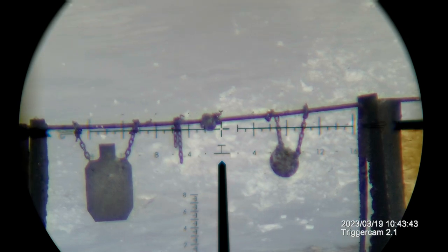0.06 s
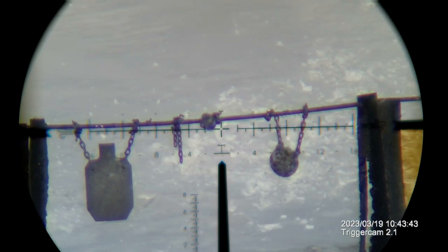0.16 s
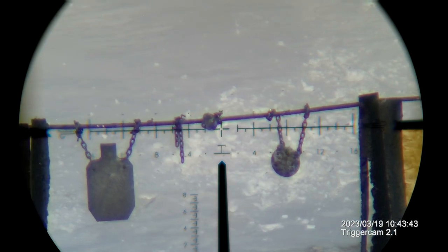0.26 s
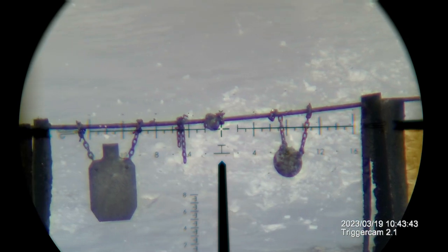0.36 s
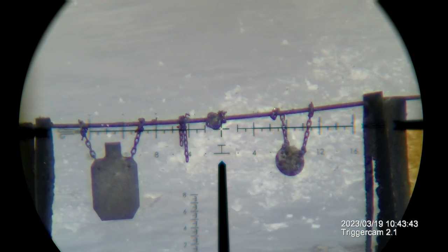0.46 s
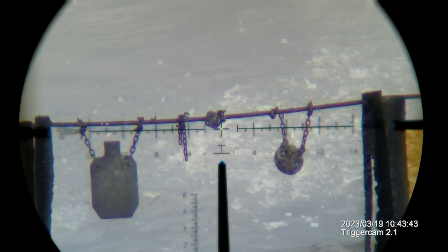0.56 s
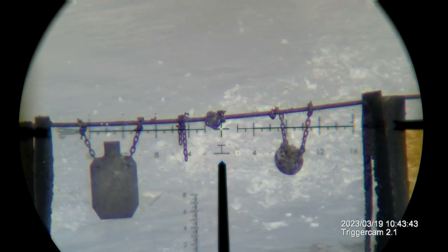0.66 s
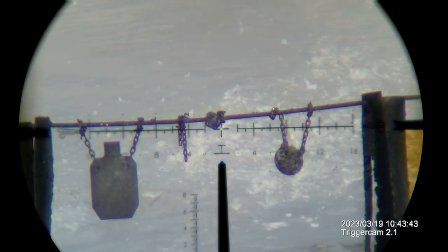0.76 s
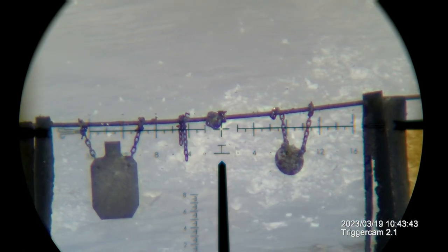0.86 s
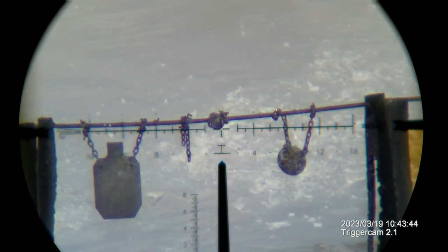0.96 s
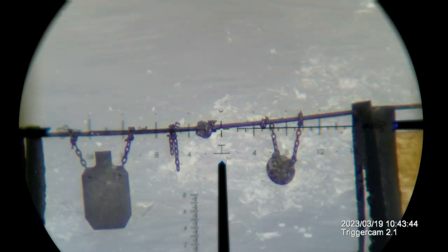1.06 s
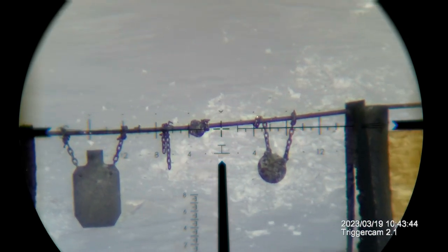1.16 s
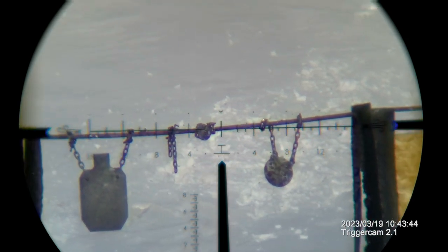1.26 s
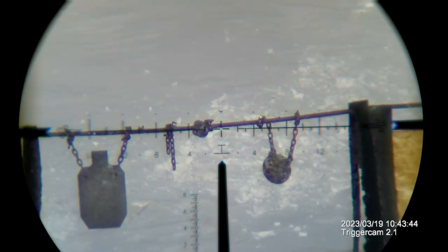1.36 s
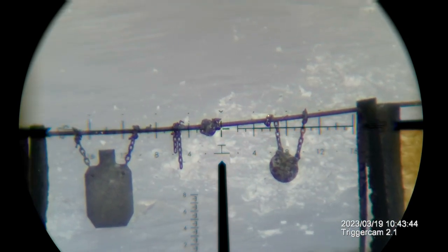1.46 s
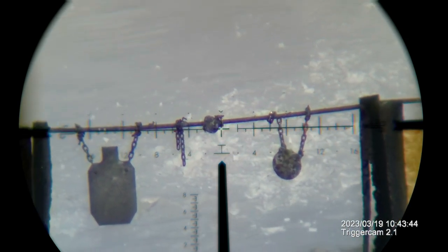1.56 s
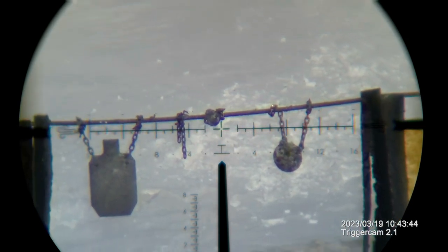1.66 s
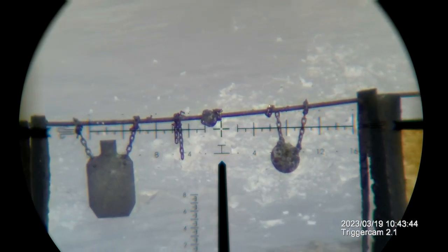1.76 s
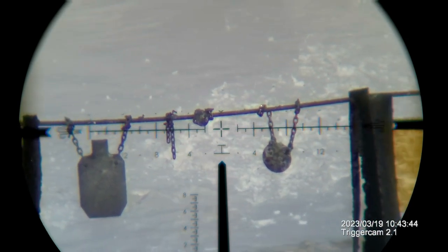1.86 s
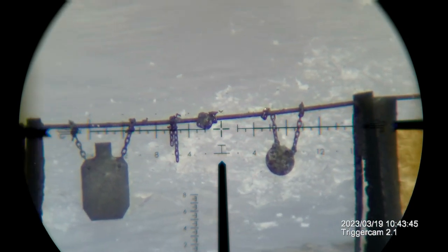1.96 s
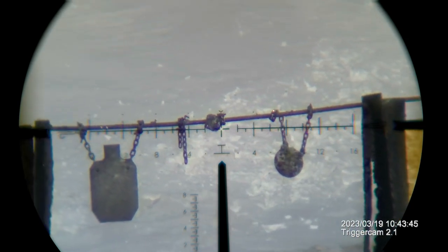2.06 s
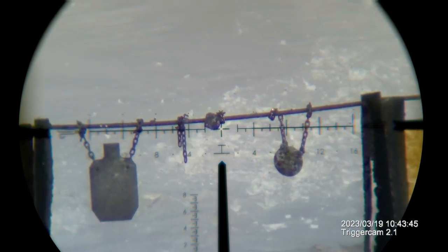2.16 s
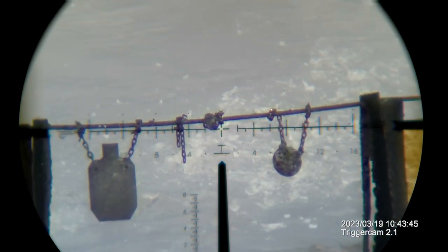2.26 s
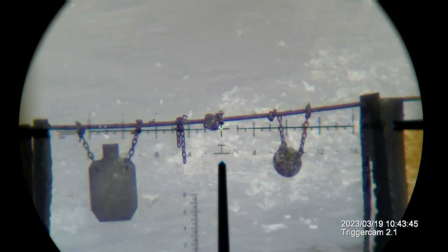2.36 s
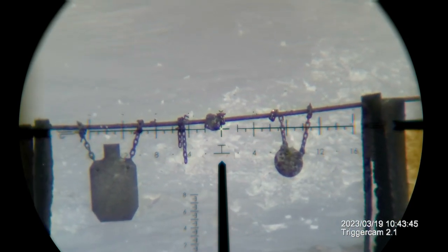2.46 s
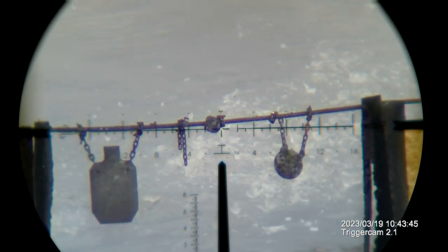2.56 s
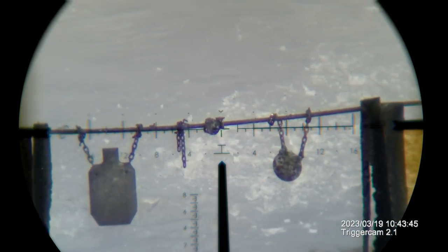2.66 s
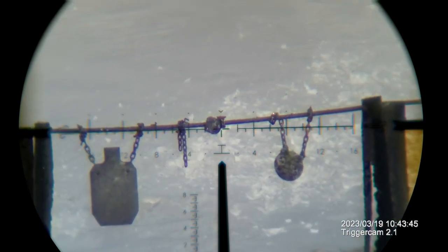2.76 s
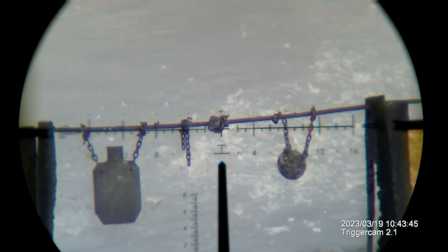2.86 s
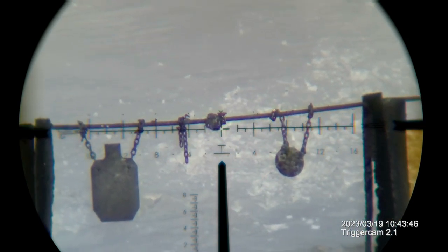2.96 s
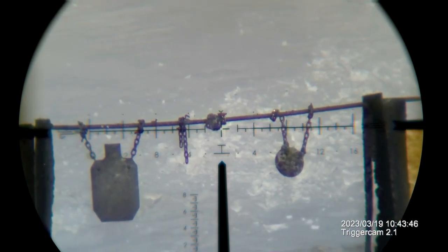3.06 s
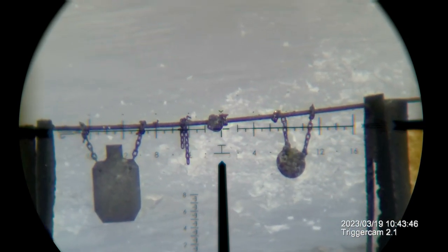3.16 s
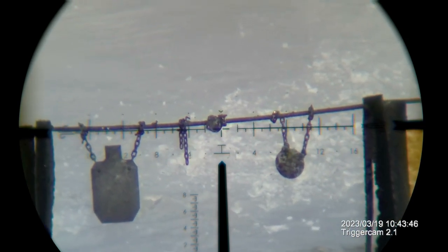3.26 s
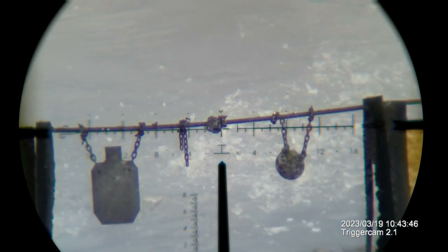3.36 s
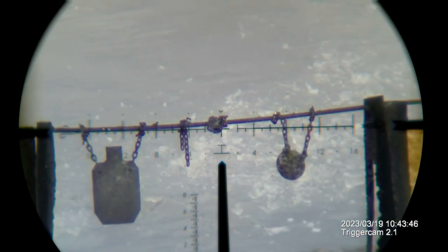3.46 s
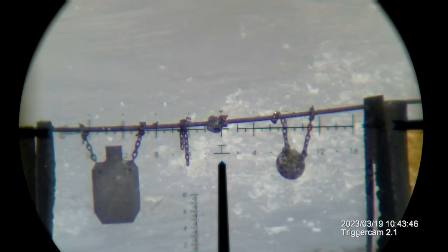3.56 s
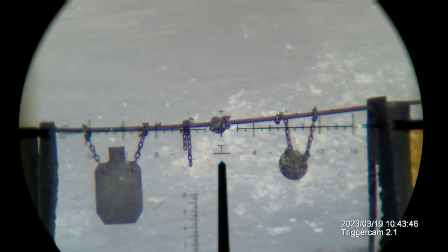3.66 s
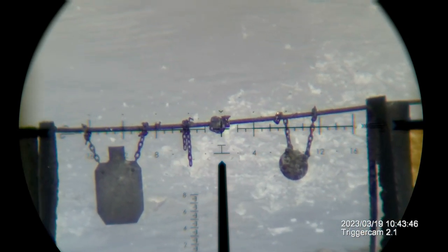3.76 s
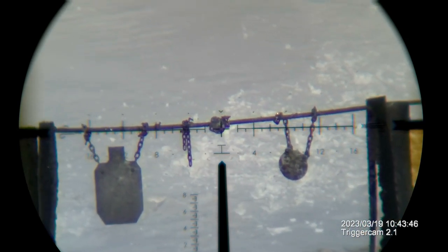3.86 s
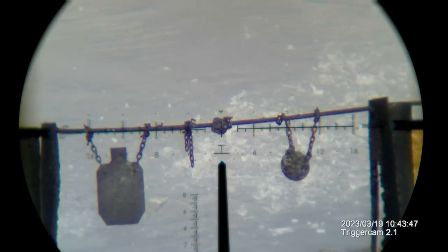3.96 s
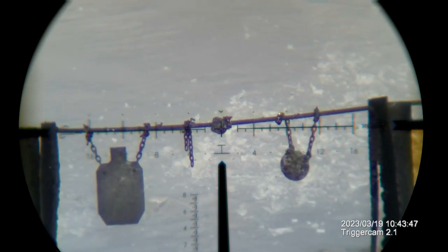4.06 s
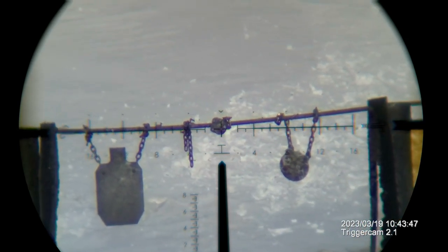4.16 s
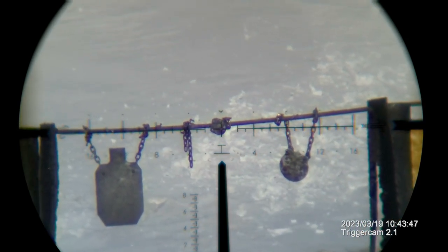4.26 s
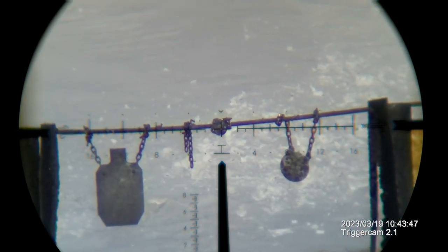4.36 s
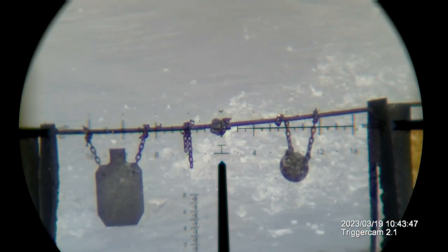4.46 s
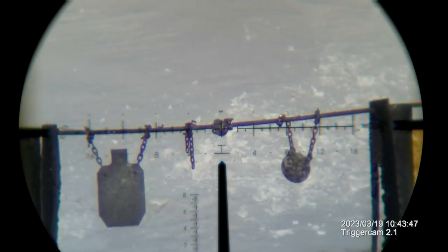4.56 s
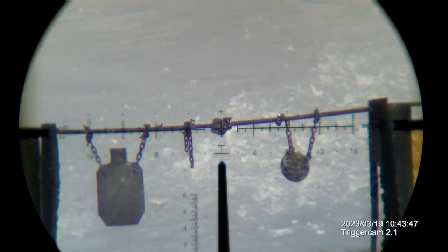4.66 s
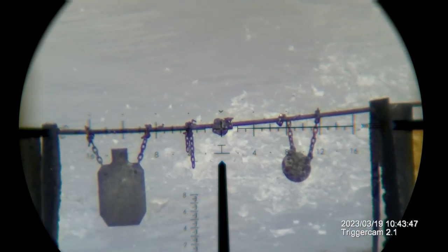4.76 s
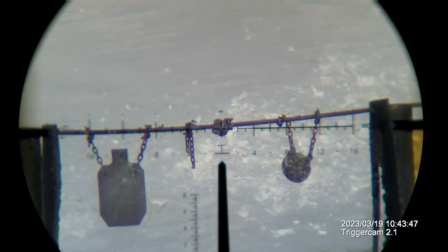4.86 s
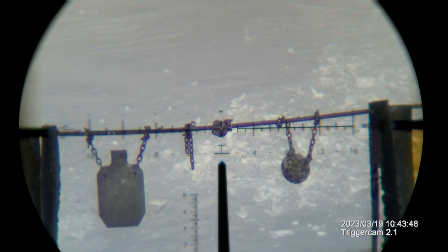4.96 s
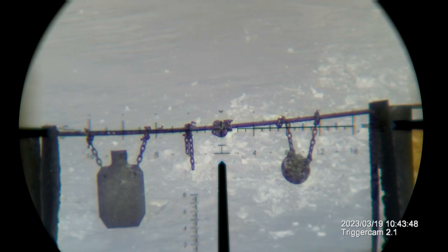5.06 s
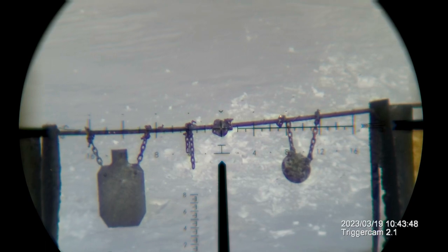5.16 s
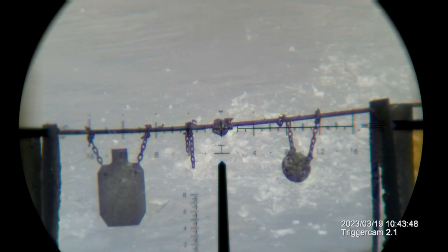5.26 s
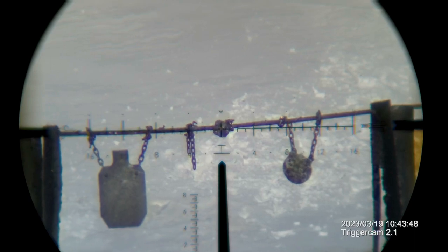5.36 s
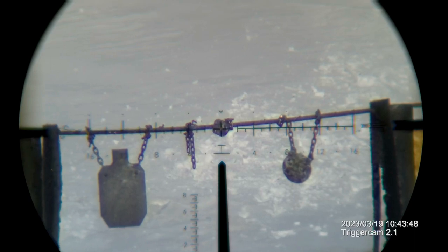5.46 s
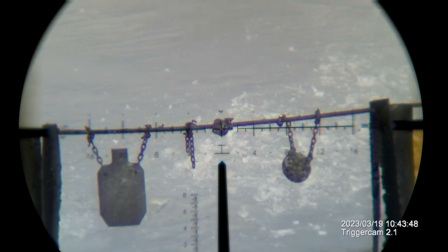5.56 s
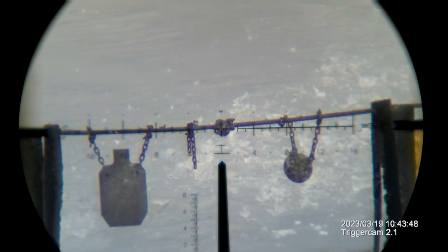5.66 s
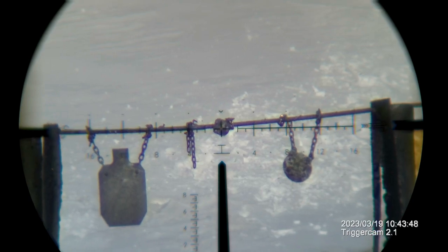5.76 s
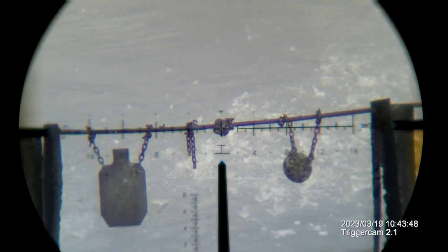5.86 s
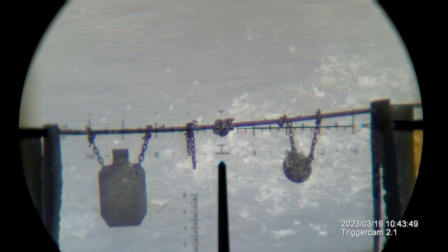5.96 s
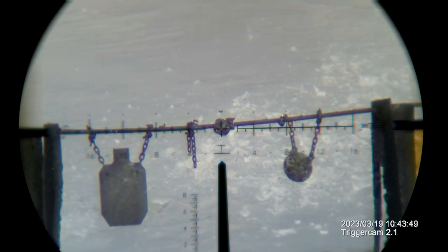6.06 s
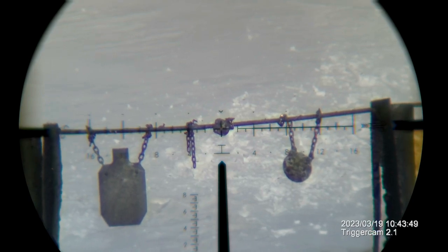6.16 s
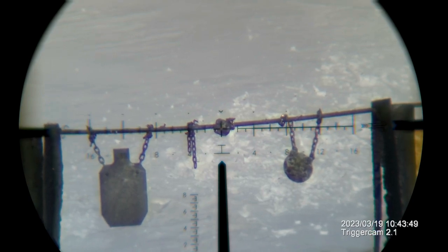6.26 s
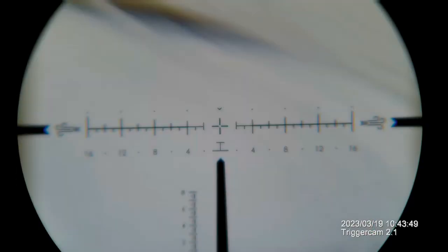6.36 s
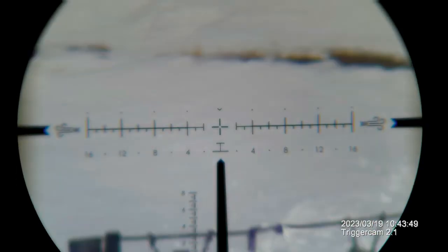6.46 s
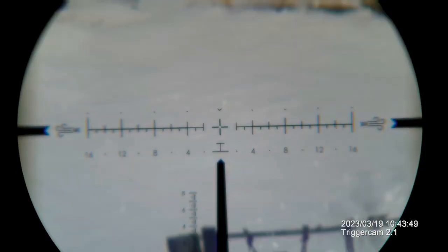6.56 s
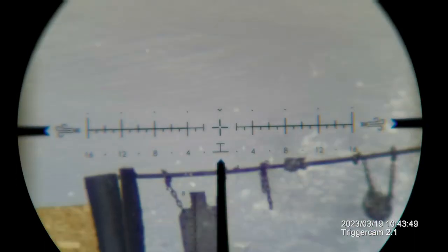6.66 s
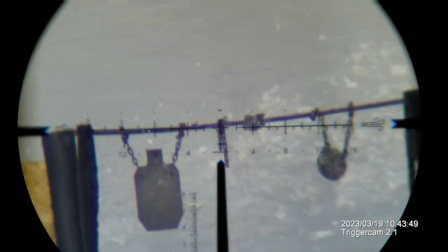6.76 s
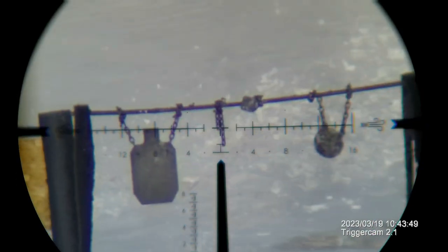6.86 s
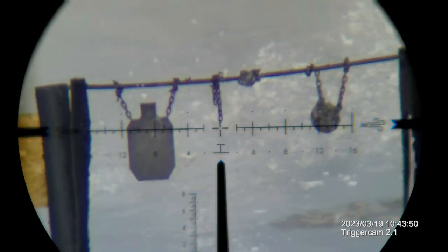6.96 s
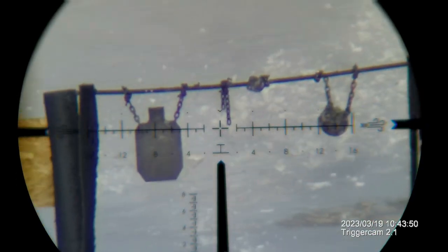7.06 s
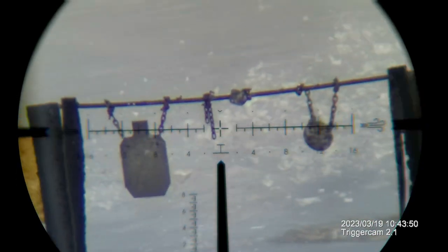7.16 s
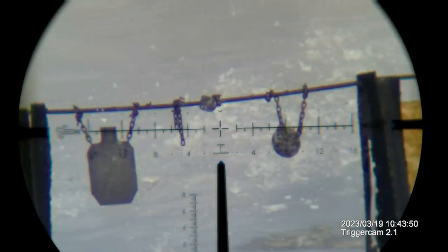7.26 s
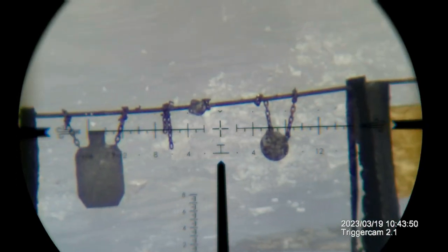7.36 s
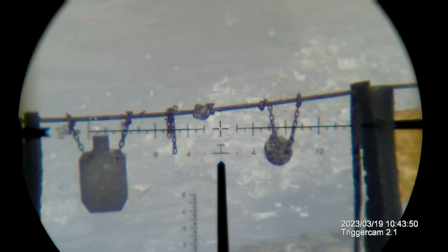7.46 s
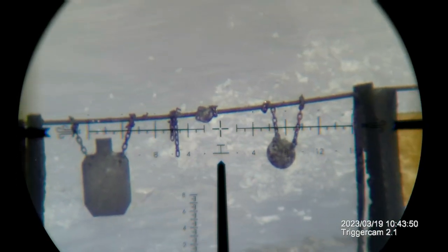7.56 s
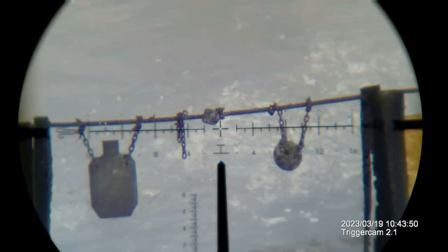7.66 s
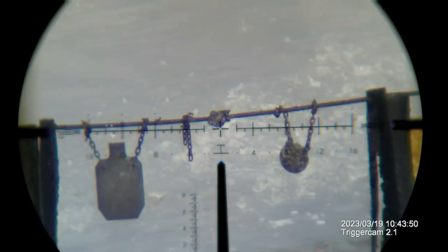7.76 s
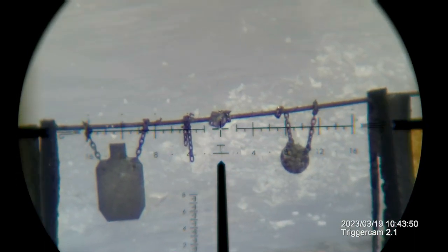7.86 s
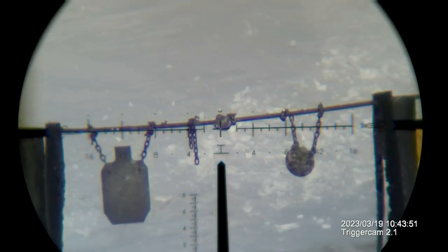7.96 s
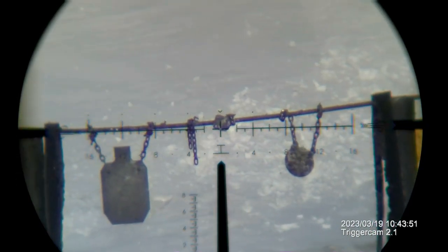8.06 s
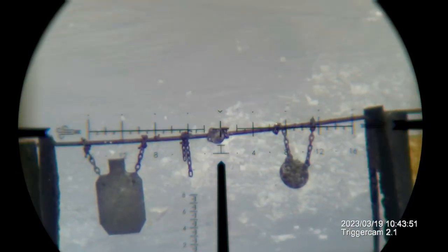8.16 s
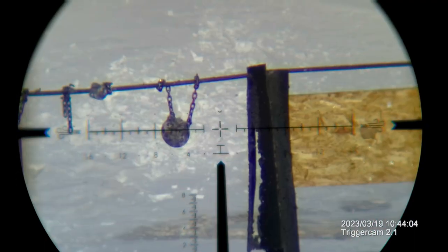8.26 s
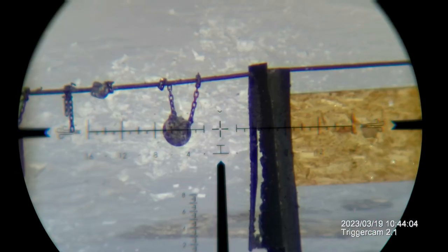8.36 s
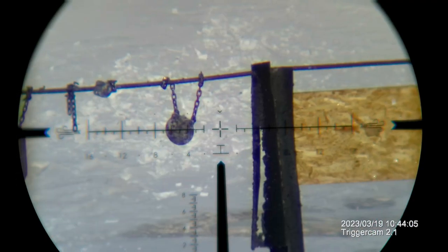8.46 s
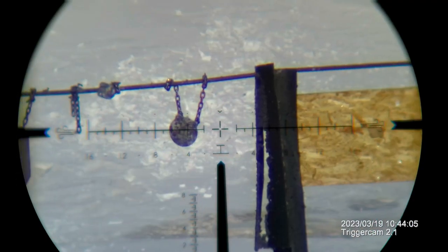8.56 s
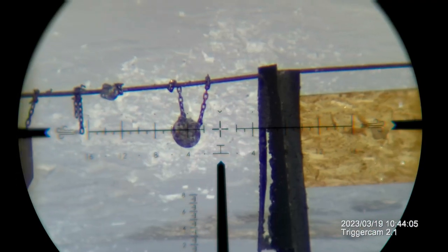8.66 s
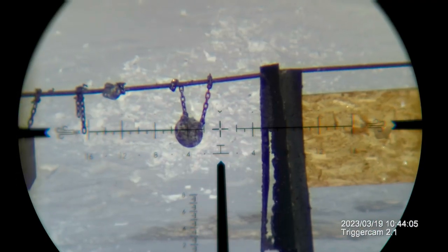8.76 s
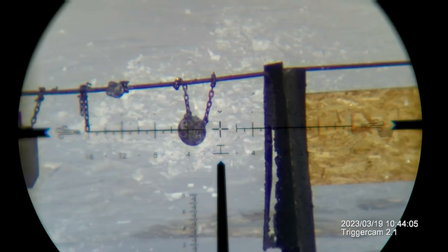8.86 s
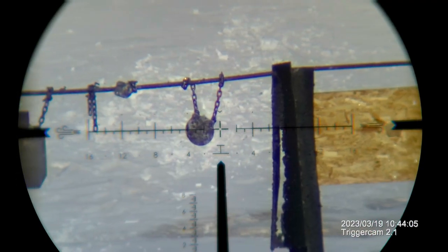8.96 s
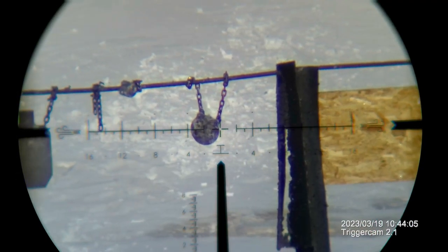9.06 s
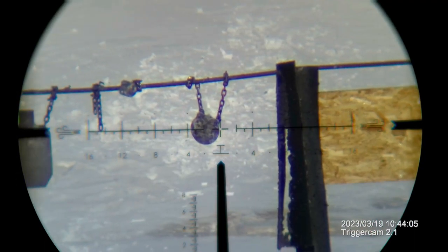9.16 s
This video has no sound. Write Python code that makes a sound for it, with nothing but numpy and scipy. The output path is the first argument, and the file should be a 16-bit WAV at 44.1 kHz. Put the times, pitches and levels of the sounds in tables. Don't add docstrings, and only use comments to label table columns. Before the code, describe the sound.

Distant engine drone and faint handling knocks, a far gunshot, then a deafening close rifle blast, ringing steel plate and sharp action clicks.

```python
import sys
import numpy as np
from scipy import signal
from scipy.fft import rfft, irfft, next_fast_len
from scipy.io import wavfile
from scipy.ndimage import uniform_filter1d

SR = 44100
rng = np.random.default_rng(int(sys.argv[2]) if len(sys.argv) > 2 else 0)


def ratio(d):
    e = np.asarray(d, float) / 20
    return 10 ** e


def generate_wav(sig):
    pcm = np.round(np.clip(np.atleast_2d(sig).T, -1, 1) * 32767).astype(np.int16)
    wavfile.write(sys.argv[1], SR, pcm)


N = 406602
TIME_S = np.arange(N) / SR


def evened(x):
    return x / np.sqrt(np.mean(x ** 2) + 1e-20)


def curve(rows):
    s, level_db = np.transpose(rows)
    return np.interp(TIME_S, s, level_db)


def noise(colour, lo_hz=0, hi_hz=SR):
    size = next_fast_len(N)
    hz = np.fft.rfftfreq(size, 1 / SR)
    f, db = np.transpose(colour)
    shape = ratio(np.interp(np.log(hz + 1), np.log(f), db, -120, -120))
    inside = (hz >= lo_hz) & (hz < hi_hz)
    shape /= np.sqrt(2 * np.sum(shape[inside] ** 2) / size)
    return irfft(rfft(rng.standard_normal(size)) * shape, size)[:N]


def resonate(x, hz, width_hz):
    r = np.exp(-np.pi * width_hz / SR)
    pole = r * np.exp(2j * np.pi * hz / SR)
    return 2 * signal.lfilter([1 - r], [1, -pole], x).real


def add(mix, s, sound):
    part = mix[round(s * SR):][:len(sound)]
    part += sound[:len(part)]


def waver(top_hz):
    t = np.arange(0, N + 200, 200) / SR
    rates_hz = top_hz * np.geomspace(1 / 8, 1, num=24)
    slow = sum(np.sin(2 * np.pi * (f * t + rng.random())) / np.sqrt(f) for f in rates_hz)
    return np.interp(TIME_S, t, evened(slow))


# pitch_hz, level_db (per Hz)
HISS_COLOUR = [(180, -3), (300, -3), (650, -6), (2190, -10.5), (6080, -16), (7530, -17.5), (9020, -13.5),
               (9800, -17.5), (12100, -17), (15300, -16)]
# pitch_hz, width_hz, level_db
FIZZ_BANDS = [(7710, 1100, -3.5), (9910, 1300, -1), (11000, 430, -5)]
# first_slot_s, end_s, writes_per_s, offset_s
DATA_WRITES = [
    (.0057, 8.26, 29.968, -.004),
    (.0057, 8.26, 23.445, -.0169),
    (8.2987, 9.22, 29.96, -.0102),
    (8.2987, 9.22, 23.5, .0135),
]


def electronics():
    gate = np.zeros(N)
    pulse = signal.windows.tukey(round(.0046 * SR), .3)
    for first, end, rate, offset in DATA_WRITES:
        due = np.arange(offset, end - first, 1 / rate)
        jitter, level = rng.standard_normal((2, len(due)))
        slots = np.round((due + .0015 * jitter) * 100) / 100
        for s, db in zip(first + slots[slots >= 0], 0.92 * level):
            add(gate, s, ratio(2 * db) * pulse)
    white = rng.standard_normal(N)
    fizz = sum(ratio(db) * resonate(resonate(white, hz, w), hz, w) for hz, w, db in FIZZ_BANDS)
    hiss = ratio(-62.5) * noise(HISS_COLOUR, 370, 19000)
    return hiss + ratio(-60.0) * np.sqrt(gate) * evened(fizz)


# pitch_hz, level_db (per Hz)
WIND_COLOUR = [(20, -4.5), (34, 3), (70, -10), (125, -13), (184, -15.5), (290, -25), (700, -42)]
# time_s, level_db
CARRY = [(0, -40.5), (.15, -41), (.66, -37.5), (.79, -42), (.98, -35.5), (1.29, -42), (1.46, -37),
         (2.0, -37.5), (2.19, -41.5), (2.36, -39.5), (3.2, -40.5), (3.74, -38.5), (4.4, -43), (5.43, -44),
         (6.1, -43.5), (7.4, -43.5), (8.3, -47), (9.2, -49)]
START_HZ, STEADY_HZ, SETTLE_S = 45.7, 51.8, 0.99


def drone():
    hz = STEADY_HZ - (STEADY_HZ - START_HZ) * np.exp(-TIME_S / SETTLE_S) + 1.0 * waver(2.9)
    carry_db = curve(CARRY)
    second_db = -50 + 1.1 * (carry_db + 39) + 1.2 * waver(1.9)
    wind_db = -56.5 + .3 * (carry_db + 39.5) + 1.0 * waver(5)
    tone = np.sqrt(2) * np.sin(2 * np.pi * np.cumsum(hz) / SR)
    fuzz = ratio(-12) * noise([(22, -7.0), (36, -5), (52, 6.0), (66, -3), (76, -16.0)])
    second = noise([(72, -16.5), (88, -4.5), (98, 3.0), (112, -18), (128, -9.5)])
    engine = ratio(carry_db + 1.5 * waver(7.7)) * (tone + fuzz)
    return engine + ratio(second_db) * second + ratio(wind_db) * noise(WIND_COLOUR, 130, 350)


# pitch_hz, width_hz
BODY = [(340, 100), (488, 24), (630, 90), (878, 36), (1030, 130), (1280, 130), (1610, 150), (1950, 220),
        (2280, 220), (2650, 320), (3200, 400), (3750, 380), (4600, 500), (7600, 900)]
TICK_SPREAD, TICK_RATTLE_DB = 0.57, -7.5


def knock(db, hz, spread=TICK_SPREAD, rattle_db=TICK_RATTLE_DB, grip_hz=0):
    t = np.arange(round(.35 * SR)) / SR
    t60 = 0.098 * (1000 / hz) ** 0.69
    rattle = ratio(rattle_db - 22.0 - 60 * t / t60) * rng.standard_normal(len(t))
    body = np.zeros(len(t))
    for f, width in BODY:
        share = np.exp(-.5 * (np.log2(f / hz) / spread) ** 2)
        decay = np.exp(-np.pi * (width + grip_hz) * t)
        body += share * decay * np.sin(2 * np.pi * f * rng.uniform(.98, 1.02) * t)
    body *= 1 - np.exp(-(t * hz * 4.3 * spread) ** 2)
    ring = signal.fftconvolve(np.append(1., rattle[1:]), body)[:len(t)]
    return ratio(db) * ring / abs(ring).max()


def knocks(rows, grip_hz):
    out = np.zeros(N)
    for s, *how in rows:
        add(out, s, knock(*how, grip_hz=grip_hz))
    return out


# start_s, level_db, pitch_hz
TICKS = [(1.2971, -45, 1174), (1.3721, -43, 1370), (1.4021, -47.5, 720), (1.4201, -42.5, 540),
         (1.4681, -43.5, 616), (1.5471, -41.5, 667), (1.6701, -50, 940), (1.8811, -49, 1650),
         (2.0471, -48, 887), (2.5791, -54, 810), (3.2801, -43, 2075), (7.7901, -43.5, 640),
         (8.2381, -43.5, 950)]
# start_s, length_s, level_db
SCRAPES = [
    (1.281, .45, -53),
    (1.861, .22, -58),
    (8.178, .06, -46.5),
]
TICK_GRIP_HZ = 50


def fingers():
    out = knocks(TICKS, TICK_GRIP_HZ)
    for s, length_s, db in SCRAPES:
        size = round(length_s * SR)
        slip_starts = rng.random(size) < 110 / SR
        slips = slip_starts * ratio(4.5 * rng.standard_normal(size))
        tiny = knock(db, 1140, 1.0, -32, TICK_GRIP_HZ)[:2000]
        add(out, s, signal.fftconvolve(slips, tiny))
    return out


# start_s, level_db, pitch_hz, spread_octaves, rattle_db
HANDLING = [(.8692, -24.5, 1230, 0.23, -13), (.871, -29.5, 570, 1.03, -14), (.8696, -44, 3080, 0.15, -14),
            (.9034, -24.5, 1510, .27, -12), (.9036, -35.5, 3800, 0.15, -14), (.905, -27.5, 620, 1, -9),
            (.9133, -38, 3770, 0.16, -14), (.9135, -35, 1490, 0.41, -18), (1.5231, -40, 1380, 0.63, -25),
            (1.7222, -34, 1200, 0.59, -12), (1.7235, -31.5, 490, 0.37, -17),
            (3.0262, -22.5, 614, 0.21, -13), (3.0257, -34.5, 2000, 0.27, 0.5), (3.026, -43, 4600, .26, -17),
            (3.051, -31, 1520, 0.39, -18), (3.047, -39, 2100, .25, -14), (3.0715, -31.5, 2420, 0.17, -20)]


def handling():
    return knocks(HANDLING, 0)


# start_s, level_db, push_s
NEIGHBOUR = [
    (3.026, 2, 0.0038),
    (3.0405, -11.5, 0.0167),
    (3.0497, -11, 0.0023),
    (3.0531, -8.5, 0.0028),
]


def neighbour():
    out = np.zeros(N)
    t = np.arange(SR // 2) / SR
    for s, db, push in NEIGHBOUR:
        front = 1 - np.exp(-(t / (0.14 * push)) ** 2)
        add(out, s, ratio(db) * (1 - t / push) * np.exp(-.7 * t / push) * front)
    return out


# pitch_hz, level_db (per Hz)
ECHO_COLOURS = [
    [(30, -5.5), (70, 3), (190, -2), (300, -7), (450, -16.5)],
    [(300, -15), (450, 1.5), (680, 1), (1000, -19.5), (1300, -19)],
    [(800, -17), (1200, 5.5), (1700, 2), (2100, -7.5), (2800, -17)],
    [(1600, -3), (2100, 9), (2500, 9.5), (3200, -8.5), (5000, -16), (9000, -25.5)],
    [(2800, -13), (3400, 1.5), (4600, -9), (5600, -15.5), (8000, -25)],
]
BAND_HZ = [150, 680, 1450, 2500, 4000]
# start_s, level_db, pitch_hz, spread_octaves, t60_s
RETURNS = [(3.045, -23, 680, 0.46, 0.089), (3.05, -27.5, 170, 0.88, 0.25), (3.027, -45, 1700, .45, 0.32),
           (3.06, -44, 2400, .3, 0.27), (3.27, -39.5, 150, .5, 0.35), (3.43, -52, 680, .2, 0.65),
           (3.38, -49, 150, .4, 1.5), (3.78, -44, 150, .4, 1.2), (3.085, -43.5, 650, .3, 0.28),
           (6.293, 3.5, 300, 0.99, .19), (6.3, -37.5, 2540, .5, 1.3), (6.38, -21, 150, 1.1, 1.5),
           (6.5, -44, 1500, 0.73, 0.23), (6.6, -36.5, 700, 0.77, 0.56), (6.63, -36.5, 2890, 0.27, 0.38),
           (6.69, -54, 3500, 0.44, 0.15), (6.77, -38.5, 600, .6, .5), (7.15, -41, 150, 0.66, 0.64)]
# start_s, level_db, pitch_hz, spread_octaves, t60_s
RUSTLE = [
    (1.27, -65, 900, 1.0, 3.0),
    (1.72, -51, 700, 0.79, 0.19),
    (6.805, -38.5, 1657, 0.58, 0.24),
    (6.85, -53, 2200, 0.62, 0.15),
    (7.022, -33.5, 1400, 0.79, 0.18),
    (8.13, -45, 252, 0.98, 1.2),
    (8.175, -60.5, 1400, .5, 0.24),
]


def echoes():
    out = np.zeros(N)
    t = np.arange(2 * SR) / SR
    level_ranges_hz = [(60, 400), (500, 850), (1480, 1980), (2100, 3400), (3400, 4600)]
    for colour, edges, band_hz in zip(ECHO_COLOURS, level_ranges_hz, BAND_HZ):
        smooth = uniform_filter1d(rng.standard_normal(N), size=300)
        lumps = evened(uniform_filter1d(smooth, size=300))
        power = np.zeros(N)
        for s, db, hz, spread, t60 in RETURNS + RUSTLE:
            share = np.exp(-.5 * (np.log2(band_hz / hz) / spread) ** 2)
            part = t[:round(min(t60, 2) * SR)]
            rise = 1 - np.exp(-part / (.05 * t60))
            add(power, s, (share * ratio(db - 60 * part / t60) * rise) ** 2)
        out += np.sqrt(power) * ratio(2.0 * lumps) * noise(colour, *edges)
    return out


# start_s, level_db, pitch_hz, spread_octaves, rattle_db
ACTION = [(6.449, -24, 3280, 0.21, -11), (6.4547, -21, 3530, .8, -18), (6.46, -25, 3120, 0.3, -21),
          (6.5024, -8.5, 2640, 0.34, -5), (6.503, -38, 590, 0.44, 0), (6.5269, -25, 2686, 0.28, -7),
          (6.6321, -20.5, 1600, 0.97, -3.5), (6.6601, -33, 2680, 0.26, 0), (6.7015, -28, 3080, 0.36, -1.5),
          (6.8038, -11.5, 2500, 0.485, -9.5), (6.804, -22.5, 800, 0.65, -13.5), (7.0189, -4, 1220, .9, -17),
          (7.0192, -25, 3780, 0.27, 3), (7.0214, -10, 1900, 0.32, -20), (7.1256, -33, 2113, 1.2, -15),
          (7.1914, -37.5, 277.6, .46, -8), (7.3467, -39, 1314, 0.2, -16), (7.3463, -39.5, 2210, 0.19, -12),
          (8.1762, -35, 1116, 0.21, -12), (8.177, -37.5, 1610, 0.18, -2), (8.1763, -41.5, 3360, .5, -8)]


def action():
    return knocks(ACTION, 25)


# pitch_hz, level_db (at 6.55 s), t60_s
STEEL = [(456.85, -22.6, 5.7), (884.1, -41, 2.6), (913.65, -31.5, 2.8), (1235.5, -41.5, 2.5),
         (312.2, -52, 4.5), (673, -50, 1.8), (856, -53, 2.4), (1330, -55, 1.2), (1372, -54, .9),
         (1453, -55, 1.1), (1631, -58, 1.6), (2019, -58, 2.6), (2165, -57, 1.9), (4270, -66, .45),
         (4974, -67, .9)]
# time_s, level_db
SWELL = [(6.24, -31.5), (6.32, -9.5), (6.47, -5), (6.58, 0)]


def steel():
    modes = np.zeros(N)
    for hz, db, t60 in STEEL:
        level_db = db - 60 * np.maximum(TIME_S - 6.55, -.3) / t60
        modes += ratio(level_db) * np.sin(2 * np.pi * (hz * TIME_S + rng.random()))
    return np.sqrt(2) * ratio(curve(SWELL)) * (TIME_S > SWELL[0][0]) * modes


# time_s, level_db
ROAR = [(6.2235, -51.5), (6.2285, -28), (6.2295, 12), (6.239, 18.5), (6.241, 2), (6.26, 0.5), (6.4, -41),
        (6.55, -55), (6.75, -62)]
# pitch_hz, level_db (per Hz)
ROAR_COLOUR = [(200, -11.5), (800, 6), (1500, -1.5), (2600, 1.5), (4000, -9.5), (8000, -14), (15000, -45.5)]
# start_s, pitch_hz, level_db, t60_s, rise_s
BOOM = [(6.2397, 280.6, 18, 0.18, 0.00032), (6.245, 99.5, 28.5, 0.042, 0.0011),
        (6.268, 215, 8.5, 0.19, 0.0016), (6.304, 328, 0.5, 0.11, 0.0024), (6.337, 135, 9, 0.054, 0.0019),
        (6.3461, 176.2, 3.5, 0.19, 0.0064), (6.435, 205.4, -10.5, 0.38, 0.0064),
        (6.5029, 333, 1, 0.011, 0.00043), (6.536, 60.4, -5.5, 0.05, 0.0045), (6.552, 197, -23, 0.32, 0.014)]
# start_s, level_db
FLUTTER = [
    (6.272, -6.5),
    (6.286, -6),
    (6.3008, -3),
    (6.316, -4),
    (6.329, -11),
    (6.347, -22.5),
]


def blast():
    out = ratio(curve(ROAR)) * noise(ROAR_COLOUR)
    out *= (TIME_S > ROAR[0][0]) & (TIME_S < ROAR[-1][0])
    t = np.arange(SR) / SR
    for s, hz, db, t60, rise in BOOM:
        envelope = ratio(db - 60 * t / t60) * (1 - np.exp(-t / rise))
        add(out, s, envelope * np.sin(2 * np.pi * hz * t))
    for s, db in FLUTTER:
        puff = rng.standard_normal(800) * ratio(-60 * t[:800] / .016)
        add(out, s, ratio(db) * (3.2 * resonate(puff, 2200, 830) + 0.28 * resonate(puff, 5000, 5000)))
    return out


def scene():
    lasting = drone() + electronics() + neighbour() + blast()
    first_scene = fingers() + handling() + echoes() + action() + steel()
    return (lasting + first_scene * (TIME_S < SCENE_CHANGE[1]))[None]


def top_cut(x):
    return signal.sosfilt(signal.butter(12, 15420, fs=SR, output="sos"), x)


# time_s, level_db
GAIN = [
    (6.249, 0),
    (6.256, -3.8),
    (6.4, -3.8),
    (6.49, 0),
]
# fade_start_s, silence_s, fade_end_s
SCENE_CHANGE = (8.222, 8.266, 8.31)


def record(dry):
    overloaded = np.clip(dry, -.96, .96)
    coupled = signal.lfilter([1, -1], [1, -np.exp(-2 * np.pi * 4 / SR)], overloaded)
    fade = np.interp(TIME_S, SCENE_CHANGE, [1, 0, 1]) ** .75
    mix = np.clip(coupled * ratio(curve(GAIN)) * fade, -1, 1)
    return top_cut(mix)


dry = scene()
out = record(dry)
generate_wav(out)
```